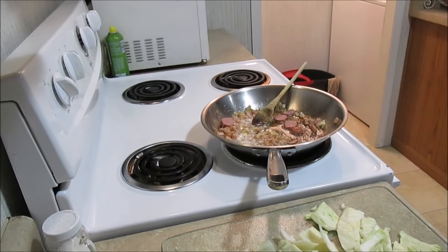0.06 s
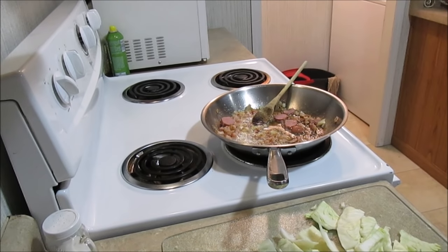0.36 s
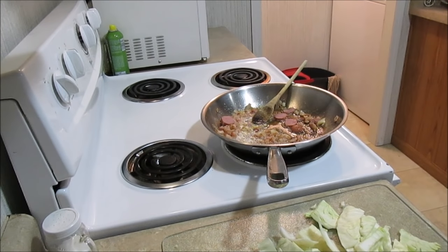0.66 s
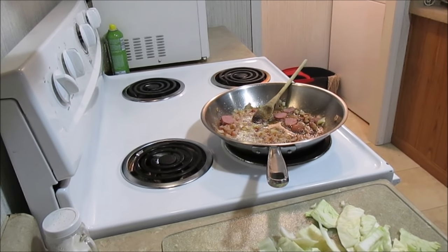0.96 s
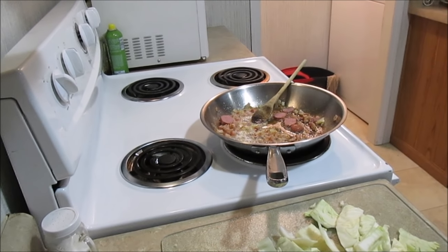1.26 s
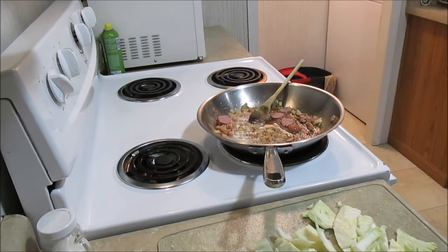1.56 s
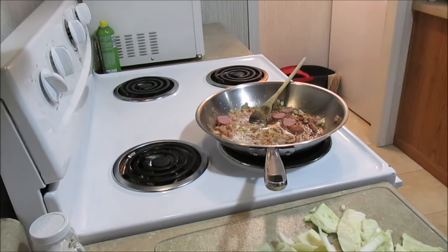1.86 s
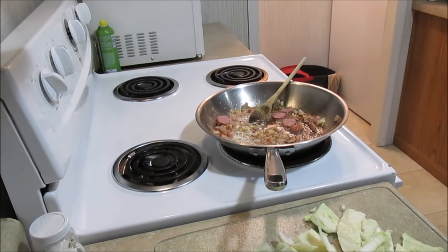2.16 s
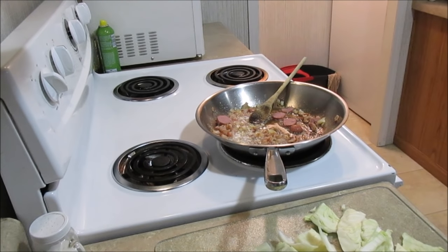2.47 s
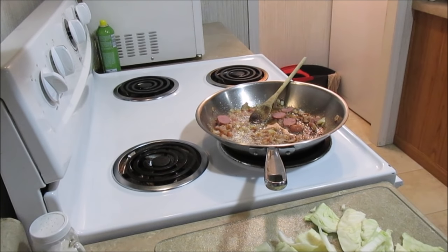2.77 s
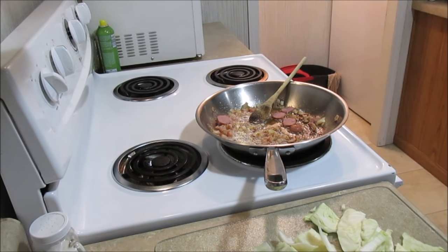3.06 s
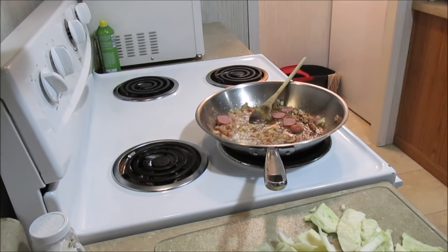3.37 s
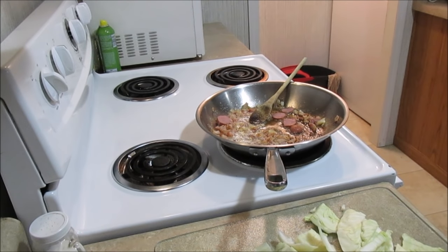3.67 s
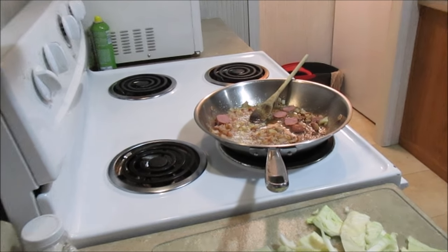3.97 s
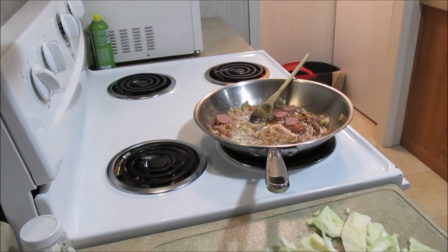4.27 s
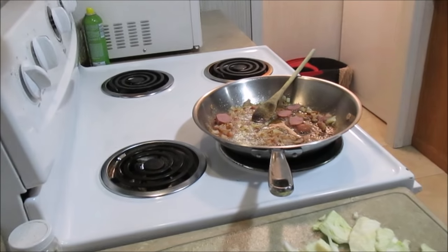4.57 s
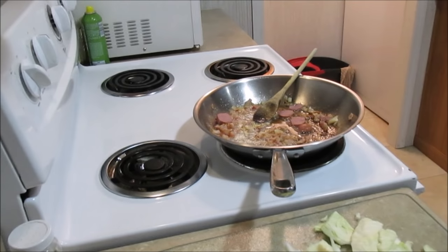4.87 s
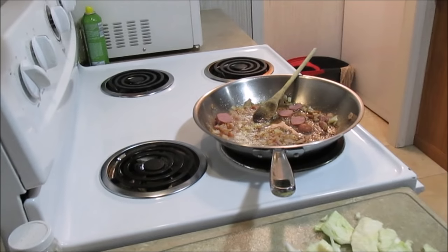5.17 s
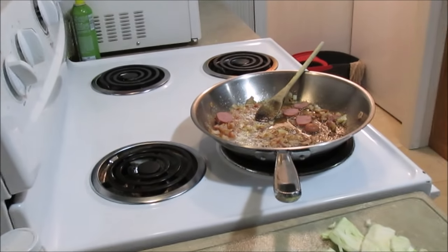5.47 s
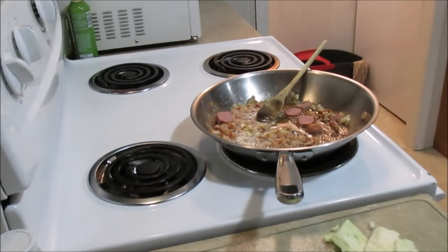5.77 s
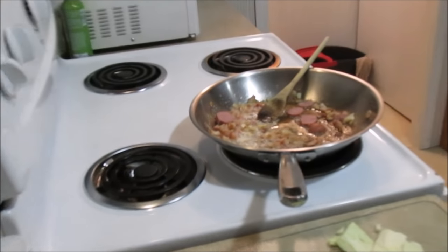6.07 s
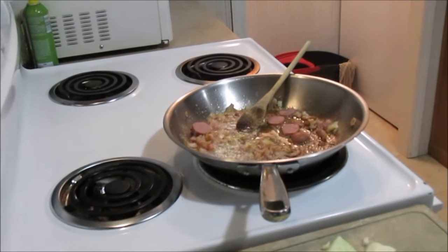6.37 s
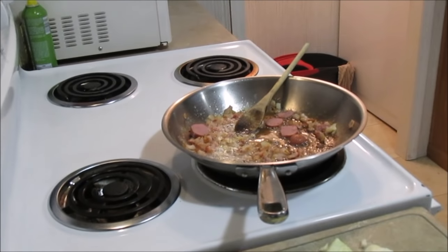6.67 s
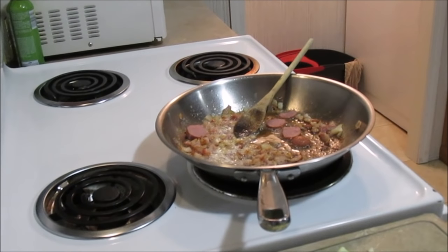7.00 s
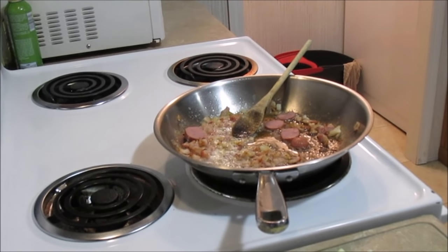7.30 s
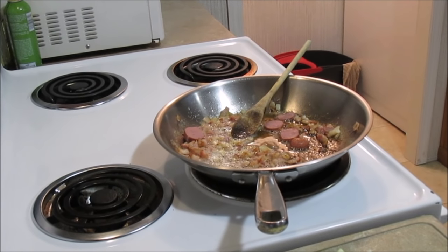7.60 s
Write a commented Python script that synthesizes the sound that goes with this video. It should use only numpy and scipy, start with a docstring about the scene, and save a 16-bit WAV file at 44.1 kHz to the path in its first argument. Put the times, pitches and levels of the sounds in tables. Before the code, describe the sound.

Meat fries in a steel skillet on a kitchen stove, a bright, steady sizzle with sharp spits of fat. An early knock hits the handheld microphone. Around the middle, fingers bump, rub and faintly squeak against it, and two more sharp knocks each make the sizzle drop suddenly and creep back. The pan fries on to the end over a faint room rumble.

```python
"""Kitchen, at the stove: bacon, onion and sausage in a steel skillet, on a hand-held camera's stereo mic.
From the start steam bubbles burst in the fat, a few spit loudly; stove top and room throw them back.
At 1.3 s the camera case takes a hard knock; from about 4 s fingers bump, rub and squeak on it, right
at the mic. After two more knocks, at 4.8 and 5.6 s, the steady sound drops and creeps back,
and the pan fries on to the end."""
import sys
import numpy as np
from scipy import signal
from scipy.fft import rfft, irfft
from scipy.io import wavfile
from scipy.ndimage import uniform_filter1d

SR = 44100
rng = np.random.default_rng(int(sys.argv[2]) if len(sys.argv) > 2 else 0)


def wav_record(signal):
    """Record a signal, one row per channel, as 16-bit PCM in the file named by sys.argv[1]."""
    frames = np.transpose(np.atleast_2d(signal))
    bounded = np.clip(frames, -1, 1)
    # unit amplitude maps onto the largest positive 16-bit level
    quanta = np.round(bounded * 32767).astype(np.int16)
    wavfile.write(sys.argv[1], SR, quanta)


N = 345744
TIME = np.arange(N) / SR
NOTCH_HZ, TOP_HZ = 7870, 15750

# how hard the pan fries: t/s, relative bubble level/dB, relative spray level/dB
FRY_LEVELS = [(0.0, -29.5, -32.5), (0.9, -29, -31.5), (1.1, -31.5, -35.5), (1.3, -29.5, -32),
              (1.4, -33.0, -32), (1.5, -29.2, -31), (1.8, -30.5, -35.5), (2.0, -30, -30.2),
              (2.5, -28, -32.5), (2.6, -28, -29.5), (3.2, -28.9, -31.5), (3.5, -31.5, -30),
              (3.8, -30.5, -33.2), (4.7, -30.5, -31.1), (4.9, -30.1, -33.5), (5.2, -26.5, -29.5),
              (6.4, -31, -31.5), (7.84, -31, -33)]
# loud spits of fat: t/s, level/dB, f/Hz
FAT_SPITS = [(0.0787, -0.5, 5860), (0.152, -7, 7240), (0.477, -4, 6230), (0.613, -5, 5830),
             (0.729, -5, 5670), (0.7573, -7, 7000), (0.9986, -0.5, 6270), (1.0099, -5, 5970),
             (1.1235, -12, 7600), (1.472, -6, 6900), (1.538, -5, 6530), (1.6076, -4, 7000),
             (1.7268, -1.5, 9900), (1.821, -6, 7100), (2.1822, -1.5, 7050), (2.528, -1, 6400),
             (3.012, -6, 6500), (3.087, 1, 6200), (3.1248, 0, 6900), (3.1686, -5, 6950), (3.4356, -2, 6600),
             (3.5254, -5, 10500), (3.621, -2.5, 7040), (3.874, -5, 6360), (4.0772, -7.5, 8600),
             (4.4867, -6, 12000), (4.5788, -6, 8300), (4.9094, -12, 6800), (5.3636, -12.5, 6900),
             (5.8192, -17, 11500), (6.7033, -13, 7160), (6.9255, -12, 10900), (7.273, -11, 7000),
             (7.414, -12, 6550), (7.7307, -7, 7550), (7.7514, -11, 12200)]
# juice spurting into the fat: t/s, length/s, f/Hz, relative level/dB
JUICE_SPURTS = [(0.398, 0.082, 5800, -21.5), (0.806, .04, 6300, -20), (1.04, .025, 5800, -20.5),
                (2.41, 0.064, 6300, -21), (2.862, 0.033, 5160, -13.5), (3.733, .06, 5760, -20.5),
                (7.046, 0.034, 5690, -27)]
# colour of the frying at the left mic port: f/Hz, gain/dB
LEFT_PORT = [(500, -25.5), (1100, -24), (2000, -18), (2900, -11), (5250, -9.5), (5950, 0.5), (7200, -3),
             (8200, -5), (10500, -7.5), (12500, -7), (14500, -10.5), (15600, -17)]
# and at the right port: f/Hz, gain/dB
RIGHT_PORT = [(500, -27.5), (1100, -20.5), (2000, -16.5), (2900, -10), (5250, -8), (6000, 0.5), (7200, -2),
              (8200, -4.5), (10500, -9), (12500, -14), (14000, -12.5), (15600, -14.5)]
# finger bumps on the camera case: t/s, body level/dB, relative rattle level/dB
FINGER_BUMPS = [(0.561, -61, -36), (1.182, -43, -53), (1.267, -32, -29), (1.724, -31, -37),
                (2.697, -32, -38), (3.834, -30, -31.5), (3.897, -38, -40.5), (4.038, -38, -31.5),
                (4.389, -28, -35.5), (4.444, -36, -36.5), (4.490, -37, -36.5), (4.618, -40, -36),
                (4.742, -31, -35.5), (4.778, -28, -32.5), (4.907, -47, -44), (5.186, -37.5, -48),
                (5.284, -39.5, -37), (5.431, -44, -39), (5.516, -34.5, -34), (5.609, -33, -44),
                (5.990, -40, -42), (6.098, -42, -43), (6.131, -54, -41), (6.197, -50, -42),
                (6.271, -37, -37.5), (6.685, -47, -43), (6.776, -46, -48), (6.866, -40, -42),
                (6.921, -46, -37), (7.380, -63, -40.5), (7.725, -48, -40)]
# hard knocks on the case: t/s, relative level/dB, length/s
CASE_KNOCKS = [(1.26, -12, 0.0056), (4.797, -11.5, 0.0045), (5.642, -14, 0.0056)]
# the case flexing under the grip: t/s, f/Hz, level/dB
CASE_FLEXES = [(1.254, 69, -23), (4.7958, 144, -5.5), (5.641, 126, -13), (5.989, 70, -32), (6.101, 90, -31),
               (6.278, 55, -29), (6.299, 51, -32)]
# skin squeaking on the case: t/s, f/Hz, length/s, level/dB
SKIN_SQUEAKS = [(4.245, 862, 0.031, -37.5), (4.505, 902, 0.027, -30), (4.858, 880, 0.028, -44),
                (5.872, 880, 0.025, -46), (5.899, 924, 0.021, -46), (7.082, 406, 0.087, -41.5)]
# fingers sliding over the case: t/s, length/s, level/dB
FINGER_RUBS = [(4.393, 0.11, -50), (4.716, 0.12, -42), (5.488, 0.2, -48.5), (6.062, 0.17, -42),
               (7.679, 0.14, -54)]
# low resonances of the case body: f/Hz, width/Hz, gain/dB
BODY_MODES = [(112, 116, -4), (264, 102, -2.5), (401, 86, -4)]
# rattling resonances of its shell: f/Hz, width/Hz, gain/dB
SHELL_MODES = [(286, 114, -3.5), (503, 130, -6), (800, 290, -4), (1090, 130, 1), (1383, 300, -3.5),
               (1740, 110, -2.5), (2090, 320, -5), (2840, 180, -5), (3330, 110, -7)]
# drops in level just after a hard knock: t/s, depth/dB
LEVEL_DIPS = [(4.801, 9.5), (5.646, 9)]
# spectrum of the kitchen's rumble: f/Hz, relative level/dB
ROOM_TONE = [(12, -13), (35, 0), (75, 0), (130, -4), (290, -11.5), (400, -7.5), (600, -13), (1100, -11.5),
             (2000, -15.5), (5000, -40)]


def sizzle(bubble_db, spray_db, froth_db=-1.47, patches=4):
    """Patches of the pan bubble in their own flurries, with their own echoes; tinier droplets fizz above."""
    out = 0
    bubble_gain, spray_gain = undb(bubble_db + 2.0), undb(spray_db + 9.5)
    for _ in range(patches):
        flurry_db = 2.5 * wander(38)
        froth = swarm(flurry_db, rate=480, lo_hz=2340, hi_hz=5470, width_hz=2530, spread_db=2, cap_db=22)
        chirps = swarm(flurry_db + 2.1 * wander(60), rate=300, lo_hz=5430, hi_hz=9230, width_hz=2100,
                       spread_db=4, cap_db=21.5, samples=112)
        spray = swarm(flurry_db, rate=520, lo_hz=8700, hi_hz=16440, width_hz=5300, spread_db=3, cap_db=10)
        patch = (chirps + undb(froth_db) * froth) * bubble_gain + spray * spray_gain
        out = out + reflections(patch, pan_db=-3.5)
    return out / np.sqrt(patches)


def swarm(flurry_db, rate, lo_hz, hi_hz, width_hz, spread_db, cap_db, samples=64):
    """Bubbles burst at random moments, most tiny, a few large, swelling in flurries."""
    when, pitch, damping, bulk = rng.random((int(rate * N / SR), 4)).T
    size_db = np.minimum(-spread_db * np.log(1 - bulk), cap_db) + flurry_db[(when * N).astype(int)]
    hz, width = lo_hz + pitch * (hi_hz - lo_hz), width_hz * 2 ** (2 * damping - 1)
    return unit(bubbles(when * N / SR, undb(size_db), hz, width, samples=samples))


def bubbles(s, gain, hz, width_hz, lag_s=0.000022, balance_db=4.0, samples=64):
    """Each bubble swells and rings briefly; its place in the pan sets lag and balance at the mic."""
    place = rng.standard_normal((len(s), 2))
    index = (s * SR).astype(int)[:, None] + np.arange(samples)
    out = []
    for side in (1, -1):
        arrival = s + side * lag_s * place[:, 0] / 2
        age = np.maximum(index / SR - arrival[:, None], 0)
        fade = age * np.pi * np.reshape(width_hz, (-1, 1))
        wave = fade * np.exp(1 - fade) * np.sin(2 * np.pi * hz[:, None] * age)
        weight = gain * undb(side * balance_db * place[:, 1] / 2)
        out.append(np.bincount(index.ravel(), (wave * weight[:, None]).ravel(), N)[:N])
    return np.array(out)


def crackle(bubble_db):
    """Crisping bacon snaps in short ticks at the low end of the sizzle."""
    ticks = swarm(2 * wander(12), rate=70, lo_hz=2240, hi_hz=5060, width_hz=3250, spread_db=3.5, cap_db=17)
    return reflections(ticks, pan_db=-1.0, room_db=-4.5) * undb(bubble_db - 6)


def spits(s, db, hz):
    """Large bubbles flash to steam with a sharp tick."""
    gain = undb(db - db_at(LEFT_PORT, hz))  # offsets the port's colour at each pitch
    pops = bubbles(s, gain, hz, width_hz=2900, lag_s=0.000012, balance_db=1.5)
    return reflections(pops, pan_db=-5.5, room_db=-6.0)


def spatter(bubble_db, rate=4, above_db=18.0, range_db=3.0, lo_hz=5800):
    """Lesser spits stand out from the bubbling at random moments, most pitched near lo_hz."""
    when, bulk, pitch = rng.random((int(rate * N / SR), 3)).T
    db = bubble_db[(when * N).astype(int)] + above_db + range_db * (bulk - 0.5)
    hz = np.minimum(lo_hz * (1 - 0.13 * np.log(1 - pitch)), TOP_HZ)
    return spits(when * N / SR, db, hz)


def spurts(rate=2500, pitch_spread=0.15):
    """Juice hits the hot steel and boils off in a tight swell of like-sized bubbles."""
    counts = (np.array(JUICE_SPURTS)[:, 1] * rate).astype(int)
    s, length, hz, db = np.repeat(JUICE_SPURTS, counts, axis=0).T
    when = s + length * rng.beta(2, 2, len(s))
    pitch = hz * np.exp(pitch_spread * rng.standard_normal(len(s)))
    gain = undb(db) * rng.random(len(s))
    return reflections(bubbles(when, gain, pitch, width_hz=1100, samples=112))


def simmer(dip_db, rate=260, lo_hz=850, hi_hz=1450, db=-52, left_db=-4.5):
    """Slow fat bubbles mutter softly under the food."""
    when, pitch, bulk = rng.random((int(rate * N / SR), 3)).T
    hz = lo_hz + pitch * (hi_hz - lo_hz)
    plops = bubbles(when * N / SR, -np.log(1 - bulk), hz, width_hz=330, samples=320)
    return unit(reflections(plops, room_db=-2.5)) * undb([[db + left_db], [db]]) * undb(1.07 * dip_db)


def bumps(rows, land_s=0.0022, slip_s=0.0018, drag_s=0.022, drag_db=-18):
    """A finger lands and drags: a burst of small slips rings the body and shell of the camera case."""
    out, t = np.zeros((2, N)), TIME[:SR // 8]
    contact = (np.exp(-t / slip_s) + undb(drag_db) * np.exp(-t / drag_s)) * np.minimum(t / land_s, 1)
    for s, body_db, rattle_db in rows:
        slips = rng.standard_normal(len(t)) ** 3 * contact
        detune = np.exp(0.042 * rng.standard_normal())  # the grip shifts the resonances a little
        body = at_level(ring(ring(slips, BODY_MODES, detune), BODY_MODES, detune), body_db, 0.026)
        rattle = at_level(ring(slips, SHELL_MODES, detune), rattle_db + 1.5, 0.012)
        add(out, s, through_case(body + rattle))
    return out


def fidgets(start_s=3.9, end_s=6.1, count=12):
    """While the grip shifts, light touches fall at loose intervals between the firm bumps."""
    when = start_s + (end_s - start_s) * (np.arange(count) + rng.random(count)) / count
    levels_db = 2.5 * rng.standard_normal((count, 2)) + [-48, -49]  # body, rattle
    return bumps(np.column_stack([when, levels_db]))


def knocks(tail_db=-25, tail_s=0.027):
    """The case snaps with a harsh, chattering crack that swells and dies in a few milliseconds."""
    out, t = np.zeros((2, N)), TIME[:SR // 12]
    for s, db, length in CASE_KNOCKS:
        swell = np.exp(-(2 * t / length - 1) ** 2) + undb(tail_db) * np.exp(-t / tail_s)
        chatter = rng.standard_normal(len(t)) * swell
        shell = at_level(ring(chatter, SHELL_MODES), db - 2, length)
        snap = at_level(colour(chatter, RIGHT_PORT), db + 3, length)
        add(out, s, through_case(shell + snap))
    return out


def flexes():
    """The case gives under the grip and returns in one low swing."""
    out, t = np.zeros((2, N)), TIME[:SR // 12]
    for s, hz, db in CASE_FLEXES:
        swing = np.sin(2 * np.pi * hz * t) * np.exp(-(t * hz) ** 4)
        add(out, s, through_case(undb(db) * swing))
    return out


def squeaks(waver=0.061, octave_db=-13):
    """Skin sticks and slips on the case fast enough to give a short, unsteady note."""
    out, drift = np.zeros((2, N)), wander(250)
    for s, hz, length, db in SKIN_SQUEAKS:
        i, n = int(s * SR), int(length * SR)
        phase = 2 * np.pi * np.cumsum(hz * (1 + waver * drift[i:i + n])) / SR
        note = (np.sin(phase) + undb(octave_db) * np.sin(2 * phase)) * np.hanning(n)
        add(out, s, through_case(np.sqrt(2) * undb(db) * note))
    return out


def rubs(shell_db=-5.5):
    """A sliding finger catches in many tiny slips that rustle through the case."""
    out = np.zeros((2, N))
    for s, length, db in FINGER_RUBS:
        n = int(length * SR)
        slips = rng.standard_normal(SR // 2)[:n] ** 3
        body = unit(ring(ring(slips, BODY_MODES), BODY_MODES))
        shell = undb(shell_db) * unit(ring(slips, SHELL_MODES))
        add(out, s, through_case(undb(db) * (body + shell) * np.hanning(n)))
    return out


def room_tone(dip_db, side_db=-3.0, left_db=-1.5):
    """The kitchen rumbles behind it all, swaying a little and following the dips part of the way."""
    sway = undb(1.2 * wander(6))
    mid, side = (unit(colour(rng.standard_normal(N), ROOM_TONE)) for _ in range(2))
    side *= undb(side_db)
    ports = np.array([undb(left_db) * (mid + side), mid - side])
    return ports * sway * undb(-48.5 + 0.59 * dip_db)


def reflections(x, pan_db=-7.5, room_db=-5.5, pan_t60=0.019, room_t60=0.16):
    """The mic hears the direct sound, a quick scatter off pan wall and stove top, and a short room tail."""
    t = TIME[:SR // 5]
    echoes = np.zeros((2, len(t)))
    for db, t60 in ((pan_db, pan_t60), (room_db, room_t60)):
        tail = rng.standard_normal(echoes.shape) * np.exp(-np.log(1000) * t / t60) * (t > t60 / 40)
        echoes += undb(db) * tail / np.linalg.norm(tail, axis=1, keepdims=True)
    echoes[:, 0] += 1
    return signal.oaconvolve(x, echoes, axes=1)[:, :N]


def through_case(x, left_db=-10.5, lag_s=0.000407):
    """Handling noise reaches mostly the right capsule, and the left later and in opposite polarity."""
    t = TIME[:len(x)]
    return np.array([-undb(left_db) * np.interp(t - lag_s, t, x, left=0), x])


def dips(fall_s=0.0099, recover_db_per_s=4.5):
    """Level change in dB: each dip falls suddenly from where the last has got to, then climbs steadily."""
    db = np.zeros(N)
    for s, depth_db in LEVEL_DIPS:
        age = np.maximum(TIME - s, 0)
        sunk = db[int(s * SR)] - depth_db * np.minimum(age / fall_s, 1)
        db = np.where(TIME < s, db, np.minimum(sunk + recover_db_per_s * age, 0))
    return db


def ring(x, modes, detune=1):
    """Drive a set of resonances; neighbouring modes move in opposite directions."""
    out = 0
    for k, (hz, width, db) in enumerate(modes):
        resonator = signal.iirpeak(hz * detune, hz / width, fs=SR)
        out = out + (-1) ** k * undb(db) * signal.lfilter(*resonator, x)
    return out


def colour(x, points, size=4096):
    """Causal filter with the given spectrum, built from its cepstrum."""
    hz = np.arange(size // 2 + 1) * SR / size
    cepstrum = irfft(np.log(undb(db_at(points, hz))))
    cepstrum[1:size // 2] *= 2
    cepstrum[size // 2 + 1:] = 0
    return signal.fftconvolve(x, irfft(np.exp(rfft(cepstrum))))[:len(x)]


def db_at(points, hz):
    """Read a spectrum on a log-frequency axis."""
    f, db = np.transpose(points)
    return np.interp(np.log(np.maximum(hz, 1)), np.log(f), db)


def wander(rate):
    """Smooth random drift of rms 1, turning rate times a second."""
    hold = int(SR / rate)
    steps = np.repeat(rng.standard_normal(N // hold + 1), hold)
    return unit(uniform_filter1d(steps, hold)[:N])


def at_level(x, db, length):
    """Scale a hit so that its first length seconds have the given level."""
    return x * undb(db) / np.std(x[:int(length * SR)])


def undb(db):
    """Decibels to gain."""
    return 10 ** (np.asarray(db) / 20)


def unit(x):
    """Scale to rms 1."""
    return x / np.sqrt(np.mean(x ** 2))


def add(out, s, sound):
    """Mix a stereo sound in at time s."""
    i = max(int(s * SR), 0)
    out[:, i:i + sound.shape[1]] += sound[:, :N - i]


def scene():
    """Pan in front, hand at the mic, kitchen behind; the dips pull the steady sounds down together."""
    s, *levels = np.transpose(FRY_LEVELS)
    dip_db = dips()
    bubble_db, spray_db = (np.interp(TIME, s, db) + dip_db for db in levels)
    frying = sizzle(bubble_db, spray_db) + crackle(bubble_db)
    frying += spits(*np.transpose(FAT_SPITS)) + spatter(bubble_db) + spurts()
    frying_at_mic = np.array([colour(frying[0], LEFT_PORT), colour(frying[1], RIGHT_PORT)])
    handling = bumps(FINGER_BUMPS) + fidgets() + knocks() + flexes() + squeaks() + rubs()
    return frying_at_mic + simmer(dip_db) + room_tone(dip_db) + handling


def record(dry, notch_width_hz=130, ceiling=0.85):
    """The camera has a narrow notch in the treble, clips the peaks and cuts the top."""
    notched = signal.lfilter(*signal.iirnotch(NOTCH_HZ, NOTCH_HZ / notch_width_hz, fs=SR), dry)
    clipped = np.clip(notched, -ceiling, ceiling)
    return signal.sosfilt(signal.ellip(12, 0.2, 90, TOP_HZ, fs=SR, output="sos"), clipped)


dry = scene()
out = record(dry)
wav_record(out)
```